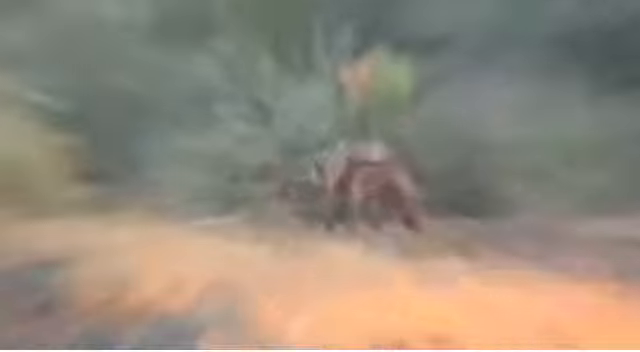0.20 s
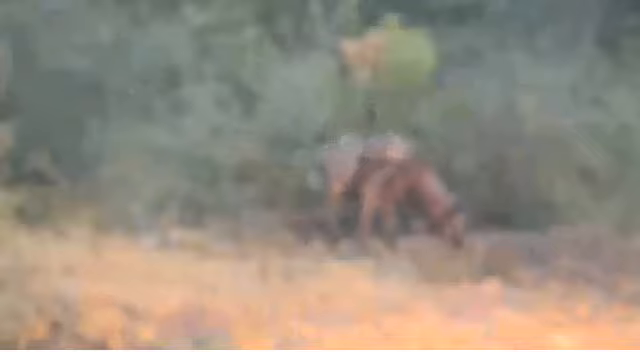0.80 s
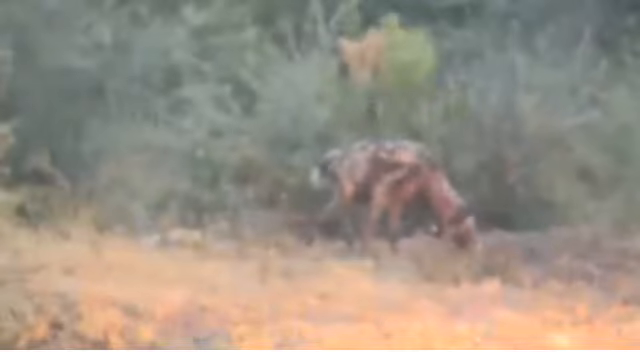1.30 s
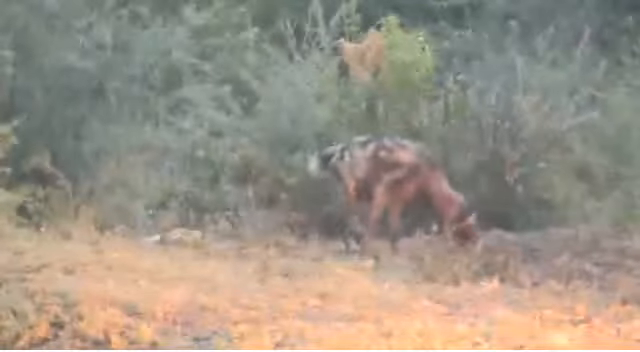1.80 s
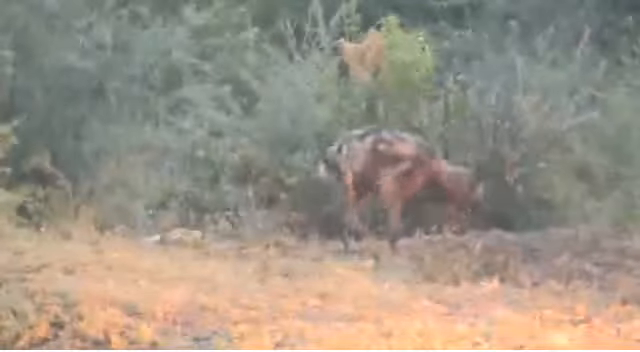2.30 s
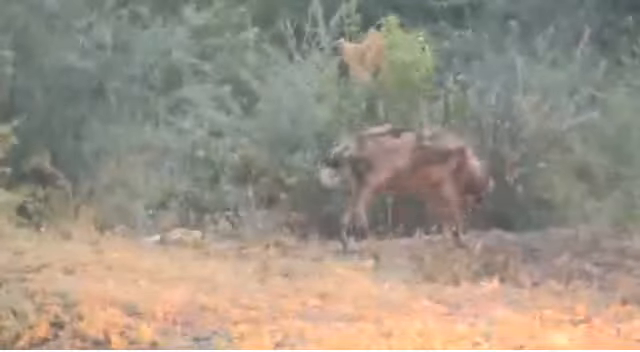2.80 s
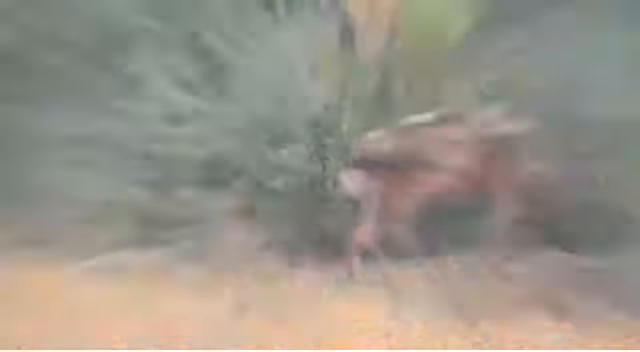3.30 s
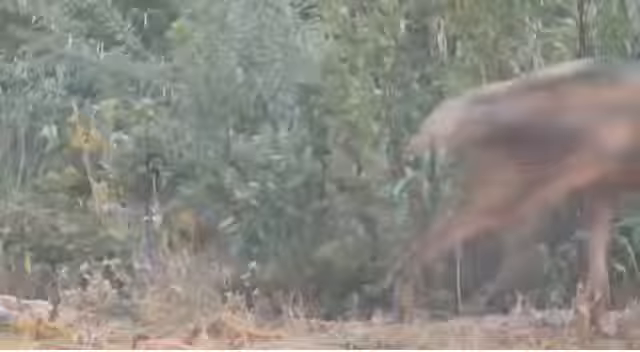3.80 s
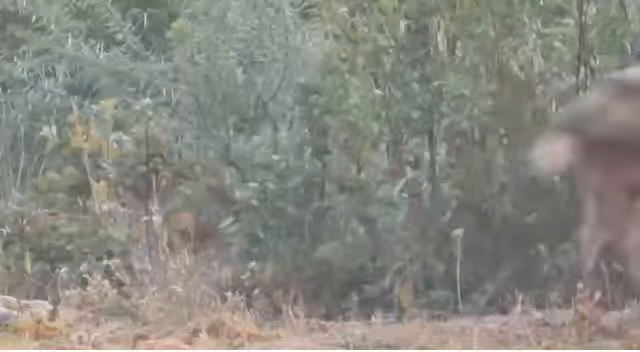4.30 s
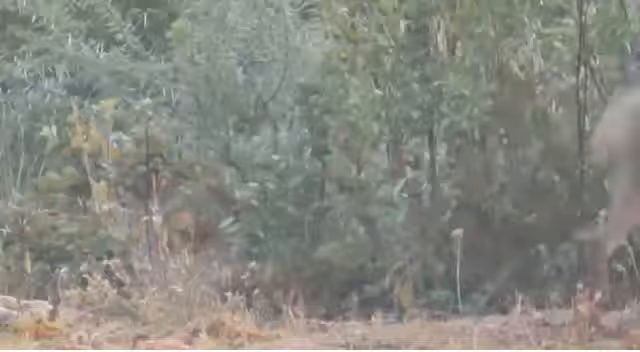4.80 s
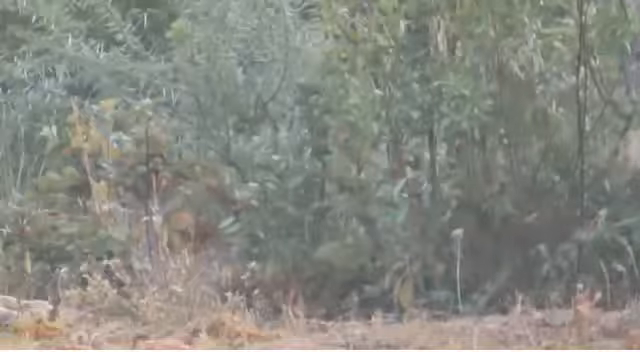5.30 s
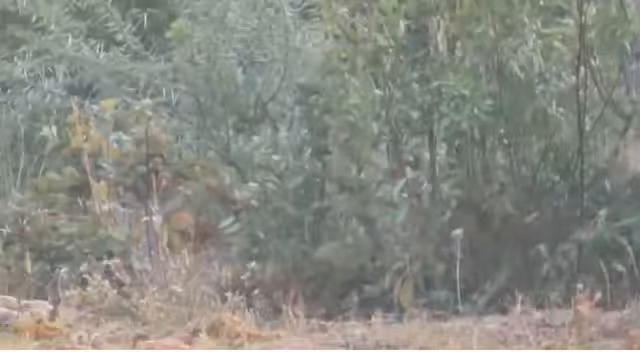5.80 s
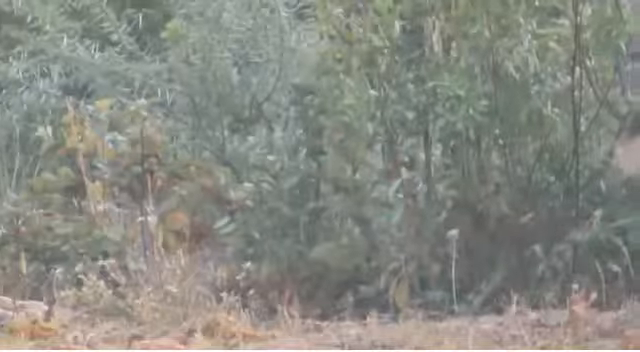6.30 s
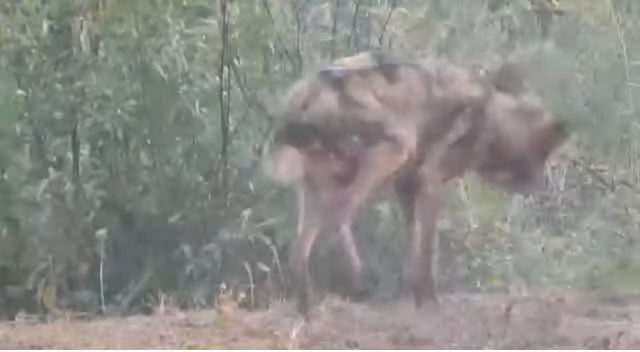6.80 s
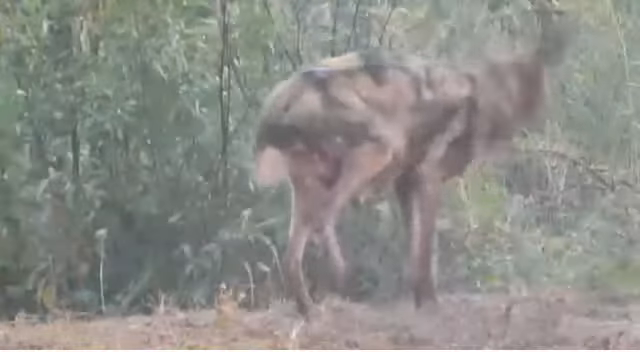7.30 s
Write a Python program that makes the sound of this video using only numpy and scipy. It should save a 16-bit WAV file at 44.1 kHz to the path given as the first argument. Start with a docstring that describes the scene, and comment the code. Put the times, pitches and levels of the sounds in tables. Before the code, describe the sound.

A wild dog close to the microphone gives about ten short, high yelps and yips at uneven intervals, some clean and some hoarse. Each squeak arches or slides down in pitch and echoes briefly off the trees. Between the calls come faint twitters, a few soft thuds like paws on dry ground and, in the second half, thin whistles of far birds. A soft wash of air and a faint hum continue throughout.

```python
"""A soft wash of air and a mains hum, at a microphone in the bush by a waterhole.
Close by, a wild dog yelps: short squeaks from its vocal folds that arch or slide in pitch, some clean,
some hoarse. Lines of trees throw each call back and the thicket rings on. Between the calls come faint
twitters, thin whistles of far birds and a few dull thuds, like paws on dry ground."""
import sys
import numpy as np
from scipy import signal
from scipy.fft import rfft, irfft, next_fast_len
from scipy.io import wavfile
from scipy.ndimage import map_coordinates

SR = 44100
rng = np.random.default_rng(int(sys.argv[2]) if len(sys.argv) > 2 else 0)


def file_out(sig):
    """Save sig as 16-bit WAV at sys.argv[1]."""
    # one column per channel
    cols = np.atleast_2d(sig).T
    # limit, then scale
    lim = np.clip(cols, -1, 1)
    pcm = np.round(lim * 32767).astype(np.int16)
    wavfile.write(sys.argv[1], SR, pcm)


N = 332073

# spectrum of the air around the microphone: frequency_hz, relative_db
AIR_SPECTRUM = [(30, -28), (75, -5), (110, -4.5), (200, -2.5), (260, -5), (450, 0), (700, 1), (1300, -4),
                (1900, -10.5), (3200, -16.5), (5500, -22), (8000, -32), (10000, -53), (12000, -73.5)]
# mains hum on the microphone line: frequency_hz, level_db
MAINS_PARTIALS = [(50, -67.5), (150, -69)]
# dull thuds on dry ground: centre_s, half_length_s, pitch_hz, level_db
PAW_STEPS = [(1.092, 0.051, 278, -52), (1.528, 0.067, 410, -51.5), (3.764, 0.046, 370, -53),
             (6.666, 0.049, 379, -49.5)]
# far birds: start_s, length_s, start_hz, end_hz
BIRD_WHISTLES = [(4.145, 0.62, 3300, 3120), (5.105, .45, 3270, 3120), (6.056, .045, 3260, 2450),
                 (6.342, .39, 2680, 2720), (7.022, 0.023, 2750, 2600)]
# echoes off the lines of trees: delay_s, spread_s, over_tail_db
TREE_LINES = [(0.051, 0.0075, -2.5), (0.102, 0.0075, -11.5), (.205, .016, -5)]
# how long the thicket rings: frequency_hz, t60_s
THICKET_DECAY = [(500, 0.55), (1500, 0.74), (3200, 1.25), (4000, 0.84), (5000, 0.64), (8000, 0.52)]
# what the bush sends back to the microphone: frequency_hz, gain_db
ECHO_COLOUR = [(400, 5.5), (750, 12), (1500, 13), (2300, 6), (3100, -1.5), (4200, 2), (5400, 8.5),
               (7000, 16), (9000, 9.5), (10500, -12.5)]
# resonances of throat and mouth: frequency_hz, gain_db
THROAT_RESPONSE = [(400, -37), (750, -25.5), (1500, -23.5), (2300, -14), (2750, -5), (3100, 2),
                   (3650, -5.5), (4000, -2.5), (4600, -4.5), (5350, -6), (6100, -19.5), (7000, -26),
                   (8000, -42), (10000, -47)]
# hoarse calls deep in the thicket: start_s, pitch_hz, echo_send_db
THICKET_CALLS = [(1.44, 864, -56.5), (3.905, 1033, -51)]
# faint twitters: crest_s, pitch_hz, level_db
FAINT_TWITTERS = [(.297, 1520, -45), (1.480, 1666, -43.5), (2.264, 1754, -43.5), (3.801, 1430, -45.5),
                  (4.171, 1590, -40), (5.141, 1537, -50), (6.0, 1450, -46), (6.113, 1706, -41)]
# the near dog's yips: start_s, pitch_hz, level_db, hoarseness (0-1), treble_db
DOG_YIPS = [(1.623, 768, -31.5, 0.22, -3.5), (3.225, 762.4, -30.5, 0.12, -9.5),
            (6.809, 716.4, -35, 0.16, -1.5)]
# its arched yelps: start_s, rise_s, pitch_hz, level_db, hoarseness (0-1), treble_db, echo_send_db
DOG_YELPS = [ (.673, .032, 773, -25.5, 0.23, -2, -16.5), (1.944, 0.037, 779, -24.5, 0.46, 1.5, -16.5),
             (2.562, .046, 602.3, -39, 0.43, 2, -16), (4.695, 0.027, 794.7, -21.5, 0.1, 1.7, -16),
             (5.4, .046, 667, -28.5, 0.23, 0, -16.5), (6.635, .024, 760.6, -34.3, 0.14, 7, -13),
             (7.323, 0.03, 745, -31, .1, 6.5, -10.5), ]

TAUT_HZ, TAUT_DB = 775, -25  # a full call, made with a taut throat
SLACK_SPAN_HZ, SLACK_SPAN_DB = 100, 13  # either drop from there leaves the throat fully slack


def amp(db):
    """Decibels to gain."""
    return 10 ** (np.asarray(db) / 20)


def unit(x):
    """Scale to rms 1."""
    return x / np.sqrt(np.mean(x ** 2) + 1e-20)


def along(points, hz):
    """Read (frequency_hz, value) points on a log axis."""
    frequencies, values = np.transpose(points)
    return np.interp(np.log(hz + 1), np.log(frequencies + 1), values)


def wobble(rate_hz, size):
    """A smooth random curve with rate_hz knots a second."""
    knots = rng.standard_normal(int(size * rate_hz / SR) + 4)
    return map_coordinates(knots, [np.arange(size) * rate_hz / SR])


def coloured(x, gain_db):
    """x through the minimum-phase filter whose gain is gain_db(hz)."""
    size = 2 * next_fast_len(len(x) // 2 + 2048)
    cepstrum = irfft(np.log(amp(gain_db(np.fft.rfftfreq(size, 1 / SR)))), size)
    cepstrum[1:size // 2] *= 2
    cepstrum[size // 2 + 1:] = 0
    return irfft(rfft(x, size) * np.exp(rfft(cepstrum)), size)[:len(x)]


def add(track, start_s, sound):
    """Mix a sound into the track at start_s."""
    part = track[max(round(start_s * SR), 0):][:len(sound)]
    part += sound[:len(part)]


def air_and_hum():
    """A soft, slightly drifting wash of air, and mains hum on the microphone line."""
    air = unit(coloured(rng.standard_normal(N), lambda hz: along(AIR_SPECTRUM, hz)))
    t = np.arange(N) / SR
    hum = sum(amp(db) * np.sqrt(2) * np.sin(2 * np.pi * (hz * t + rng.random()))
              for hz, db in MAINS_PARTIALS)
    air_db = -53 + .23 * wobble(9.9, N) + .91 * wobble(13, N)
    return amp(air_db) * air + hum


def paws():
    """Each step is a dull puff of sand: noise falling 22 dB an octave either side of its pitch."""
    out = np.zeros(N)
    for centre_s, half_length_s, pitch_hz, db in PAW_STEPS:
        size = int(2 * half_length_s * SR)
        band_db = lambda hz: -22 * np.minimum(np.abs(np.log2((hz + 1) / pitch_hz)), 3)
        puff = unit(coloured(rng.standard_normal(size), band_db))
        add(out, centre_s - half_length_s, amp(db) * puff * np.hanning(size))
    return out


def far_birds():
    """Thin, distant whistles that flutter in level and pitch; the brief ones are the louder."""
    out = np.zeros(N)
    for start_s, length_s, start_hz, end_hz in BIRD_WHISTLES:
        size = int(length_s * SR)
        phase = 2 * np.pi * np.cumsum(np.linspace(start_hz, end_hz, size)) / SR
        db = -70.5 - 9 * np.log10(length_s)
        swell = signal.windows.tukey(size, .5) * amp(db + 2.1 * wobble(42, size))
        add(out, start_s, swell * np.sin(phase + 1.3 * wobble(60, size)))
    return out


def bush_echo(call, gap_s=.034, shrubs_db=-8, clump_db=2):
    """Weak scatter from near shrubs, then lines of trees farther off in a long, clumpy tail."""
    hz, t, spectrum = signal.stft(rng.standard_normal(SR), SR, nperseg=256)
    decay = amp(-60 * t / along(THICKET_DECAY, hz)[:, None])
    tail = signal.istft(spectrum * decay, SR, nperseg=256)[1]
    t = np.arange(len(tail)) / SR
    arrival = np.interp(t, [0, .008, gap_s - .006, gap_s], [0, amp(shrubs_db), amp(shrubs_db), 1])
    trees = 1 + sum(amp(db) * np.exp(-np.abs(t - delay) / spread) for delay, spread, db in TREE_LINES)
    tail = tail * arrival * trees * amp(clump_db * wobble(50.8, len(t)))
    echo = signal.fftconvolve(call, tail / np.linalg.norm(tail))
    return coloured(echo, lambda hz: along(ECHO_COLOUR, hz))


def voice(rise_s, fall_s, contour_hz, pointed, hoarse, treble_db, low_db, nasal_db=-40):
    """One push of air through the vocal folds: pitch, loudness and mouth opening move together."""
    def mouth_db(hz):
        """A wider mouth lifts the treble; a lax throat lets the low partials through."""
        treble = treble_db * along([(3800, 0), (4400, .88), (7000, 1.2), (8500, 1.9)], hz)
        lows = low_db * along([(1900, .88), (3000, .15)], hz)
        return along(THROAT_RESPONSE, hz) + treble + lows

    start_hz, crest_hz, end_hz = contour_hz  # the crest is the top of the swell
    t = np.arange(int((rise_s + fall_s) * SR)) / SR
    off_crest = np.clip(np.where(t < rise_s, 1 - t / rise_s, (t - rise_s) / fall_s), 0, 1)
    bend = 1.59 if start_hz > crest_hz else 2.098  # a downward slide is straighter than an arch
    pitch = crest_hz + (np.where(t < rise_s, start_hz, end_hz) - crest_hz) * off_crest ** bend
    # the folds beat least evenly as they start and stop
    rasp = np.clip(hoarse, .001, 1) * (1 + 3 * off_crest ** 2) + .26 * off_crest ** 2
    jitter = .035 * rasp * wobble(600, len(t)) + .006 * wobble(110, len(t))
    phase = 2 * np.pi * np.cumsum(pitch * (1 + jitter)) / SR
    opening = (pitch / crest_hz) ** .75  # the resonances sink with the pitch as the mouth closes
    # hoarse folds alternate strong and weak beats, which puts partials halfway between the harmonics
    ratios = np.arange(2, 37)[:, None] / 2
    weights = np.where(ratios % 1 == 0, 1, np.minimum(.9 * rasp, .5))
    shimmer_db = (1.5 + 3 * off_crest) * np.array([wobble(90, len(t)) for _ in ratios])
    # the treble is last to come and first to go
    tilt = (ratios / 4) ** (-off_crest ** 2 * np.where(t > rise_s, 2.92, .7))
    strength = amp(mouth_db(ratios * pitch / opening) + shimmer_db) * weights * tilt
    folds = unit((strength * np.cos(ratios * phase - .18 * ratios ** 2)).sum(0))
    breath = unit(coloured(rng.standard_normal(len(t)) * (1 + .71 * np.cos(phase)), mouth_db))
    from_mouth = (folds + .4 * rasp * breath) / np.sqrt(1 + (.4 * rasp) ** 2)
    swell = np.abs(np.cos(np.pi / 2 * off_crest)) ** pointed
    # the fundamental leaves through the nose just after the crest
    from_nose = amp(nasal_db) * np.sin(phase) * np.sin(np.pi * np.sqrt(off_crest)) ** 2 * (t > rise_s)
    return from_mouth * swell + from_nose


def twitters(rise_s=.0065, fall_s=.011, echo_send_db=-16.5):
    """Faint twitters that slip downward, each with its echo off the bush."""
    out = np.zeros(N)
    for crest_s, hz, db in FAINT_TWITTERS:
        slide = 1.08 * hz, hz, .8 * hz
        call = amp(db) * voice(rise_s, fall_s, slide, pointed=1.4, hoarse=.16, treble_db=7, low_db=21.5)
        add(out, crest_s - rise_s, call)
        add(out, crest_s - rise_s, amp(echo_send_db) * bush_echo(call))
    return out


def far_calls(rise_s=.048, fall_s=.045):
    """Hoarse calls from deep in the thicket; only their echo reaches the microphone."""
    out = np.zeros(N)
    for start_s, hz, echo_send_db in THICKET_CALLS:
        slide = 1.1 * hz, hz, .8 * hz
        call = voice(rise_s, fall_s, slide, pointed=1.2, hoarse=.16, treble_db=-7, low_db=16)
        add(out, start_s, amp(echo_send_db) * bush_echo(call))
    return out


def dog_call(rise_s, fall_s, contour_hz, pointed, db, hoarse, treble_db, echo_send_db,
             extra_low_db=0, leaf_blur=.067, squeak_lead_s=.002):
    """One call near the microphone: a tiny high squeak breaks in, then the full voice and its echo."""
    crest_hz = contour_hz[1]
    # the throat slackens in lower, softer calls, which brings up the low partials and the nasal hum
    slack = (TAUT_HZ - crest_hz) / SLACK_SPAN_HZ + (TAUT_DB - db) / SLACK_SPAN_DB
    low_db = -3.5 + 17.5 * np.clip(slack, 0, 1) + extra_low_db
    nasal_db = -34.5 + 11 * slack
    squeak_db = -37 + .5 * (db - TAUT_DB)
    squeak = voice(.0055, .0055, [2.35 * crest_hz] * 3,
                   pointed=.61, hoarse=.045, treble_db=3.5, low_db=13.5)
    shape = rise_s, fall_s, contour_hz, pointed
    direct = voice(*shape, hoarse, treble_db, low_db, nasal_db)
    # the bush hears the mouth from all sides, whichever way the head points, and blurs the partials
    all_round = voice(*shape, hoarse + leaf_blur, .5 * treble_db, 1.06 * low_db, nasal_db)
    out = np.zeros(SR)
    add(out, 0, amp(squeak_db) * squeak)
    add(out, squeak_lead_s, amp(db) * direct)
    add(out, squeak_lead_s, amp(db + echo_send_db) * bush_echo(all_round))
    return out


def near_dog(yelp_fall_s=.028, yip_rise_s=.00913, yip_fall_s=.02345):
    """Yelps arch over a crest, deeper with effort and length; short yips only slide down."""
    out = np.zeros(N)
    for start_s, rise_s, hz, db, hoarse, treble_db, echo_send_db in DOG_YELPS:
        effort = amp(.25 * (db - TAUT_DB))
        arch = hz * (1 - effort * 6.2 * rise_s), hz, hz * (1 - effort * .262)
        pointed = 40.4 * rise_s  # the longer the rise, the more pointed the swell
        yelp = dog_call(rise_s, yelp_fall_s, arch, pointed, db, hoarse, treble_db, echo_send_db)
        add(out, start_s, yelp)
    for start_s, hz, db, hoarse, treble_db in DOG_YIPS:
        slide = 1.08 * hz, hz, .762 * hz
        yip = dog_call(yip_rise_s, yip_fall_s, slide, pointed=1.47, db=db, hoarse=hoarse,
                       treble_db=treble_db, echo_send_db=-8, extra_low_db=-4.5, leaf_blur=.24)
        add(out, start_s, yip)
    return out


def scene():
    """The near dog and the bush around it, at one microphone by the waterhole."""
    return (near_dog() + twitters() + far_calls() + far_birds() + paws() + air_and_hum())[None]


def record(dry):
    """The microphone line rolls off above 8.2 kHz and passes nothing over 10.7 kHz."""
    hz = np.fft.rfftfreq(N, 1 / SR)
    roll_off = amp(along([(8200, 0), (9200, -8), (10700, -15)], hz))
    return irfft(rfft(dry) * roll_off * (hz < 10700), N)


dry = scene()
out = record(dry)
file_out(out)
```